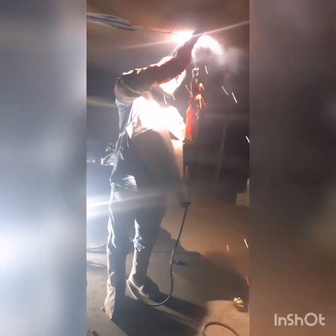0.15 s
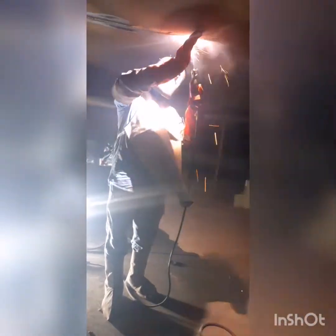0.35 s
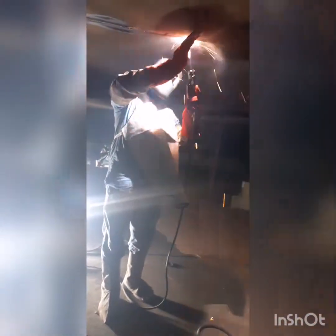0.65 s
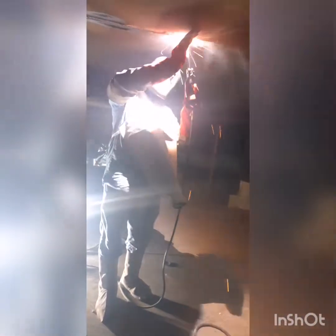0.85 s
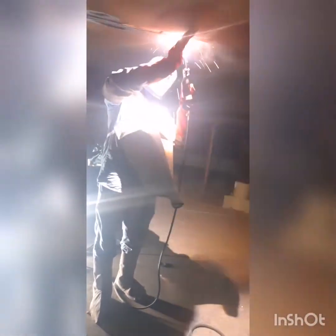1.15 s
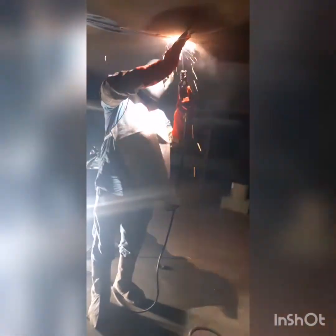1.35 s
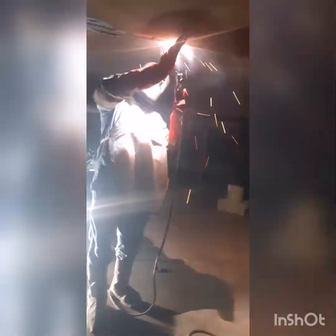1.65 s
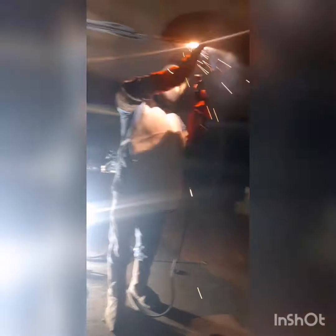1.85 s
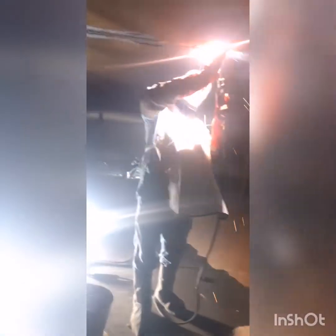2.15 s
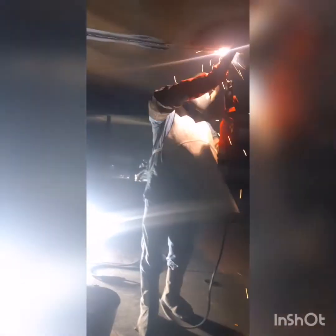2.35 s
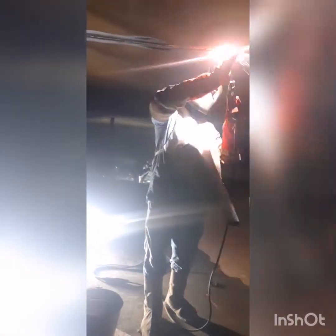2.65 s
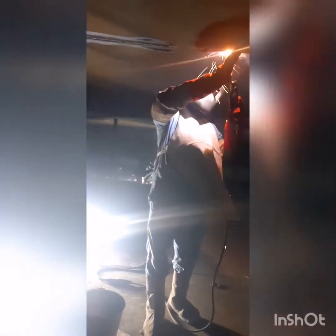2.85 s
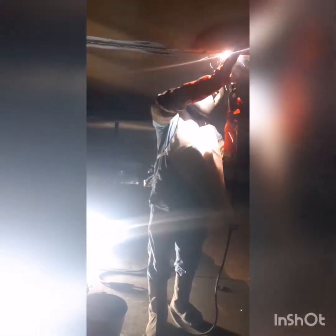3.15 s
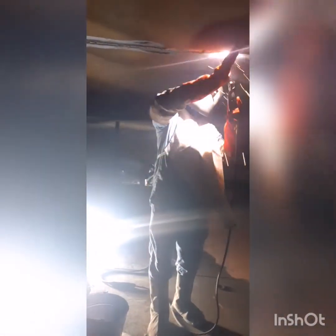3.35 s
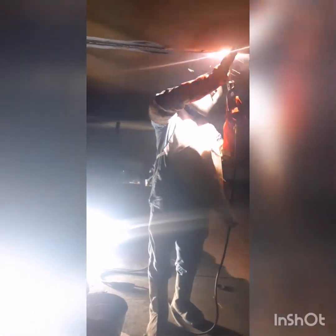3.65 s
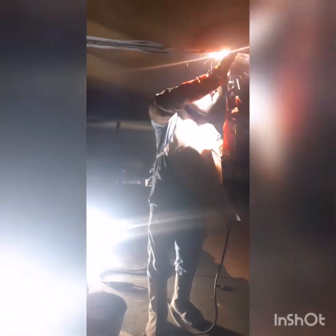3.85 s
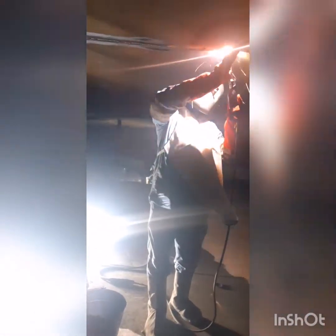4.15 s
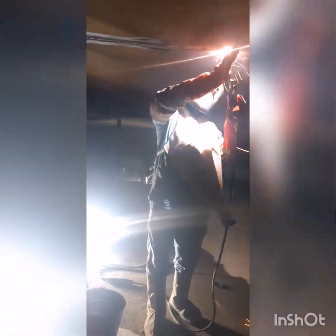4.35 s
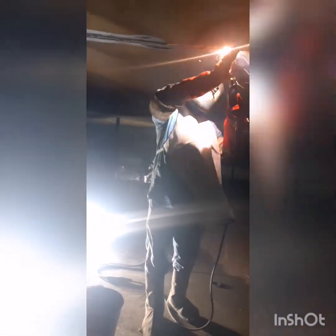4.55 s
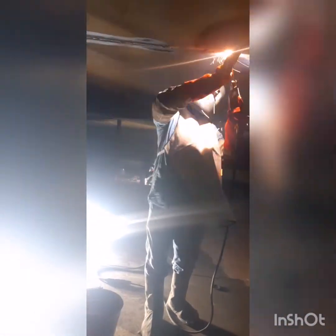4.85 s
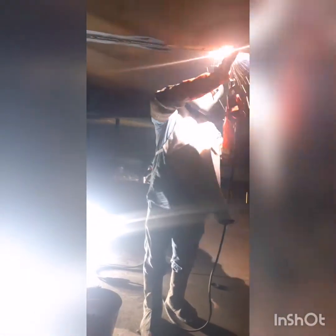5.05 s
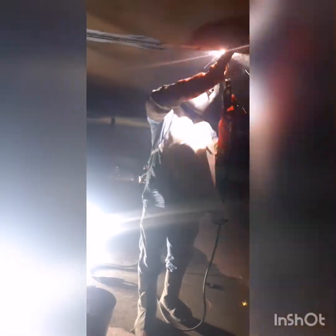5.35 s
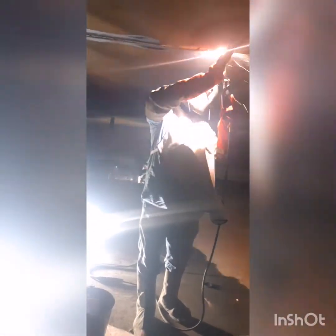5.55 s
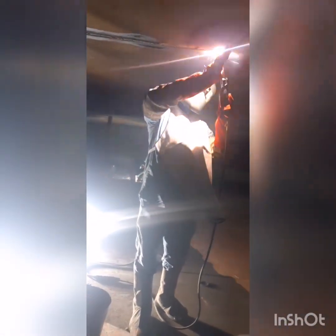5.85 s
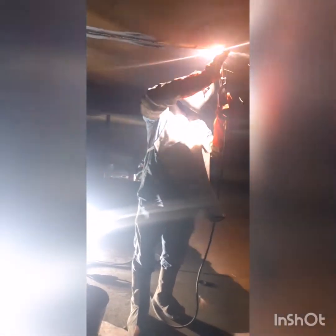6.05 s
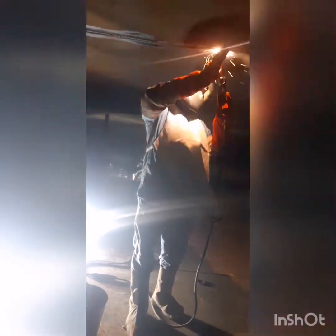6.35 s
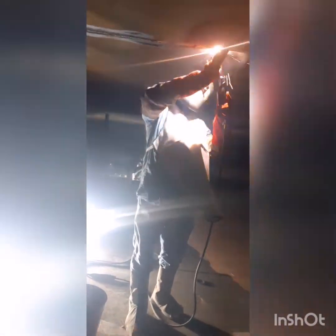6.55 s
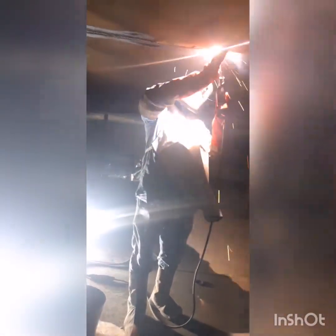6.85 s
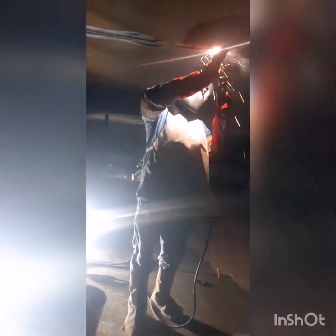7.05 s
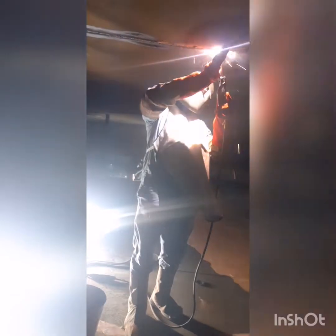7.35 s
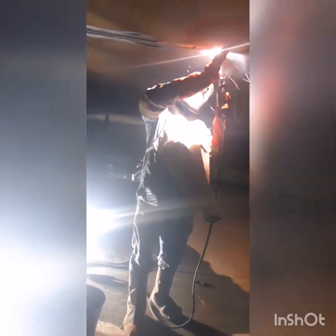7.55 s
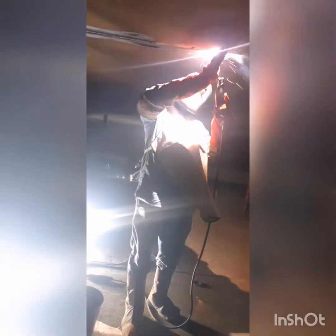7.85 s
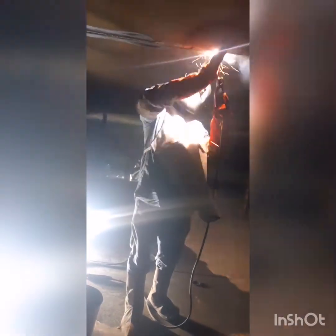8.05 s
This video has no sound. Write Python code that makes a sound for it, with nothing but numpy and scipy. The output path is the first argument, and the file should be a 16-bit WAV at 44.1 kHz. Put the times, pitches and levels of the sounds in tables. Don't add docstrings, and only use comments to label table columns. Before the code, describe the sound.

In a closed, hard-walled metal space, an electric arc roars and sizzles constantly, fluttering as droplets pop and spit. Behind it an extractor fan hums low and pushes breathy air through a duct, sinking when the arc grows loud. The middle is fullest; later the sizzle eases and several sharp, high metallic spatters flare. Handheld stereo pickup, faint handling rumble, short diffuse reverberation.

```python
import sys
import numpy as np
from scipy import signal
from scipy.io import wavfile
from scipy.ndimage import uniform_filter1d, map_coordinates

SR = 44100
rng = np.random.default_rng(int(sys.argv[2]) if len(sys.argv) > 2 else 0)


def boost(x):
    u = np.asarray(x, float) / 20
    return 10 ** u


def unload_wav(signal):
    wavfile.write(
        sys.argv[1],
        SR,
        np.round(np.clip(np.atleast_2d(signal).T, -1, 1) * 32767).astype(np.int16),
    )


N = 362061

# time_s, roar_db, gap (-1 short to 1 long)
ARC_COURSE = [(0.0, -22, -0.2), (1.0, -21.5, -0.43), (1.68, -20, -0.56), (1.88, -19, -0.25),
              (2.17, -20.5, -0.057), (2.63, -21, 0.6), (2.7, -17, 0.7), (3.0, -16, .1), (3.43, -17, -0.026),
              (3.62, -19.5, 0.032), (4.0, -17, 0.54), (4.48, -18.5, -0.032), (5.2, -16.5, 0.26),
              (5.86, -17.5, .1), (6.08, -21.5, 0.39), (6.5, -25, -0.19), (6.86, -27.5, -0.19),
              (8.21, -23.5, -0.048)]
# freq_hz, density_db (per Hz)
ROAR_SPECTRUM = [(290, -38), (500, -22.5), (676, -16.5), (929, -13.5), (1270, -5), (1630, -5), (2540, -4.5),
                 (3700, -3.5), (4400, -3.5), (7170, -4.5), (8770, -13.5), (12800, -11), (15600, -18)]
# centre_hz, level_db, db_per_arc_db, db_per_gap
CAVITY_MODES = [(2590, 1, 0.14, -2), (4430, 2, 0.23, 2), (6620, -0.5, 0, 4)]
CAVITY_WIDTHS_HZ = [800, 650, 800]
# centre_hz, width_hz, level_db
PLATE_MODES = [(1160, 49, 1.5), (1734, 50, 2), (2180, 24, 1), (3044, 36, 4.5), (3510, 41, 2.5),
               (3970, 31, 5.5), (4280, 17, 3), (4400, 18, 1.5), (4500, 23, -9), (5000, 40, 1.5),
               (7660, 30, 5)]
# peak_s, rise_db, fade_s, pitch_hz, spray_db_per_db
DROPLET_SURGES = [(0.2, 2, 0.03, 2800, 1), (0.62, 2, 0.13, 2930, 0), (1.69, 1, 0.012, 2700, .3),
                  (1.78, 3, 0.03, 2600, 0.5), (1.96, 5, .1, 2900, 0), (2.72, 1, 0.12, 7010, 4.5),
                  (2.97, 1.5, 0.11, 2500, -1.5), (3.46, 2.1, .05, 3000, 1.2), (3.54, 4, 0.048, 4400, .5),
                  (3.68, 1.5, 0.052, 3000, 0.5), (3.88, 1, .1, 2900, .4), (4.1, 0.8, 0.13, 4310, 1.2),
                  (4.55, 2, 0.087, 6600, -0.8), (4.73, 3, 0.069, 6600, 0), (4.96, -0.5, 0.012, 4400, 3),
                  (5.03, 1.5, .1, 6700, -1.7), (5.4, 0, .12, 4350, -1), (5.72, 1, 0.12, 4380, -1),
                  (5.9, 0, 0.039, 4500, 2.5), (6.33, 5.5, 0.1, 6650, 0.2), (6.88, 2.5, .06, 4500, 2.5),
                  (7.251, 1.5, 0.13, 4300, 3.5), (7.57, 3, 0.11, 2880, 1.5), (7.88, 3, 0.096, 3600, 1)]
# centre_s, level_db, length_s
POOL_HEAVES = [(1.12, -3, 0.025), (2.72, 4, .02), (2.79, 3.5, 0.037), (2.95, 4, 0.024), (3.36, 2, .12),
               (4.43, 0.5, .05), (4.53, 1, 0.026), (4.85, 3, 0.11), (5.35, 3.5, 0.22), (5.67, 3.5, 0.065),
               (5.9, 2, 0.11), (6.38, 4.5, 0.053), (7.29, 3, 0.034), (7.49, 0, 0.026), (7.57, 1, .04),
               (7.95, 2.5, .06)]
# freq_hz, t60_s
HOLD_T60 = [(500, 0.38), (4000, 0.17), (14000, 0.23)]
# time_s, air_db
FAN_LEVEL = [(0.0, -38), (0.2, -36.5), (0.87, -35), (2.0, -34.5), (2.55, -35.5), (3.0, -43), (3.7, -44.5),
             (4.4, -42), (5.7, -42.5), (6.5, -42), (7.45, -42), (7.93, -36), (8.21, -38)]
# freq_hz, density_db (per Hz)
AIR_SPECTRUM = [(13, -66), (22, -42), (76, -25), (129, -8), (190, -9.5), (243, -4.5), (340, -3.5),
                (428, -8), (689, -0.5), (823, -14), (1130, 4), (1500, -13), (1950, -37), (3300, -120)]
# centre_hz, width_hz, level_db
DUCT_MODES = [(254.7, 47, 10.5), (369, 24, 7.5), (648, 32, 3), (1335, 60, 11.5)]
# time_s, pitch_hz, level_db
BLADE_TONE = [(0.0, 159.5, -56), (0.2, 156.3, -45.5), (0.5, 158, -57), (1.17, 157, -56),
              (1.39, 158.5, -41.5), (1.7, 158.3, -40), (2.08, 160.7, -40.5), (2.17, 159.5, -50),
              (2.42, 160.7, -38), (2.72, 159, -43), (2.9, 159, -56), (3.5, 159.7, -54), (4.45, 160.8, -47),
              (5.8, 162.7, -47), (6.4, 161.5, -48.5), (6.6, 162, -48), (7.55, 161.3, -44.5),
              (8.21, 161.5, -44.5)]
# centre_s, level_db, length_s
BLADE_NULLS = [(1.17, -8, .04), (1.48, -8, .04), (3.64, -5, .05), (4.02, -8, 0.12), (4.34, -12, 0.039),
               (6.45, -9, .04), (6.77, -10, 0.07), (7.61, -7, 0.029)]
# centre_hz, level_db (over air), wander_hz, swing_db
DUCT_WHISTLES = [
    (333.4, -6, 2, 2),
    (698, -5, 7.1, 2),
]
# centre_s, level_db, length_s
DUCT_PUFFS = [
    [(0.12, 11, 0.16), (0.45, 5, .1), (0.85, 6, 0.17), (1.7, 3.5, 0.24), (2.6, 5.5, 0.2), (3.1, 6, 0.18),
     (3.86, 6, .1), (7.36, 8.5, .1), (8.0, 4, .12)],
    [(0.09, 9, 0.074), (0.59, 4, 0.068), (0.85, 8, .08), (1.25, 7.5, 0.3), (1.85, 3, .12), (5.65, 5, .2),
     (6.35, 5, 0.09), (7.36, 10.5, .1), (8.05, 5, 0.17)],
]
# freq_hz, density_db (per Hz)
HAND_SPECTRUM = [(15, -30), (30, -20), (55, -4), (110, 8), (150, -25), (300, -120)]
# start_s, peak_db, ring_hz, t60_s
SPATTER_FLARES = [(6.8743, -19, 5380, 0.12), (7.2275, -9, 6040, 0.091), (7.258, -9, 5940, 0.088),
                  (7.2887, -11.5, 6100, 0.12), (7.4894, -24, 6360, 0.097), (7.5416, -7.5, 6050, 0.12),
                  (7.561, -9, 5980, 0.11), (7.5993, -12, 6200, 0.088), (7.856, -12, 7000, 0.12),
                  (7.892, -8, 6050, 0.14), (7.9044, -12, 6560, 0.12)]

PORT_LAG_S = 18 / SR
MID_ARC_DB, MID_GAIN_DB = -20, -39
SURGE_RISE_PER_FADE = 0.53
BODY_DB, BODY_GROWS, BODY_DUCKS, BODY_PER_GAP_DB = -9, 0.32, 0.5, -2.5
SIZZLE_DB, SIZZLE_GROWS, SIZZLE_DUCKS, SIZZLE_PER_GAP_DB = -9.5, 0.85, 0.22, 1.5
DRIFT_SHARE, DRIFT_DB, DRIFT_KNOTS_PER_S = 0.025, 0.62, 6.2
FAVOUR_DB_PER_DB, FAVOUR_WIDTH_HZ = 1.03, 620


def unit(x):
    return x / np.sqrt(np.mean(x ** 2) + 1e-20)


def steady(x):
    power = uniform_filter1d(np.mean(x ** 2, 0), SR // 4)
    return x / np.sqrt(np.abs(power) + 1e-12)


def along(points, hz):
    point_hz, value = np.transpose(points)
    return np.interp(np.log(hz + 1), np.log(point_hz + 1), value)


def curves(rows, t):
    time_s, *columns = np.transpose(rows)
    return [np.interp(t, time_s, column) for column in columns]


def wobble(knots_per_s):
    knots = rng.standard_normal(int(N * knots_per_s / SR) + 4)
    return map_coordinates(knots, [np.arange(N) * knots_per_s / SR])


def slow(t, knots_per_s):
    return np.interp(t, np.arange(N) / SR, wobble(knots_per_s))


def bump(hz, centre_hz, width_hz):
    return 1 / (1 + (2 * (hz - centre_hz) / width_hz) ** 2)


def bells(rows, t):
    return sum(db * np.exp(-((t - s) / length_s) ** 2) for s, db, length_s in rows)


def patches(shape, bins, frames):
    field = uniform_filter1d(rng.standard_normal(shape), bins, 0)
    return unit(uniform_filter1d(field, frames, 1))


def diffuse(gain_db, patchy_db, streaky_db, endwise, size):
    hz, t, (one, other) = signal.stft(rng.standard_normal((2, N)), SR, nperseg=size)
    hz = hz[:, None]
    broad = patches(one.shape, size // 96, 8192 // size)
    thin = patches(one.shape, 2, 5)
    end = np.sign(patches(one.shape, size // 16, 16384 // size))
    share = np.clip(endwise, 0, 1)
    all_round = np.sinc(1.89 * hz * PORT_LAG_S)
    in_line = np.exp(2j * np.pi * hz * PORT_LAG_S * end)
    alike = (1 - share) * all_round + share * in_line
    pair = np.array([one, alike * one + np.sqrt(np.abs(1 - np.abs(alike) ** 2)) * other])
    shape_db = gain_db(hz, t) + patchy_db * broad + streaky_db * thin
    return signal.istft(pair * boost(shape_db), SR, nperseg=size)[1][:, :N]


def hold(x):
    hz, t, z = signal.stft(rng.standard_normal((2, SR // 2)), SR, nperseg=256)
    decay = boost(-60 * t / along(HOLD_T60, hz)[:, None])
    tail = signal.istft(z * decay, SR, nperseg=256)[1]
    return signal.fftconvolve(x, tail / np.linalg.norm(tail[0]), axes=1)[:, :N]


def each_surge(t):
    peak_s, rise_db, fade_s = np.transpose(DROPLET_SURGES)[:3, :, None]
    u = (t - peak_s) / fade_s
    return rise_db * np.exp(np.where(u < 0, u / SURGE_RISE_PER_FADE, -u))


def surge(t):
    return each_surge(t).sum(0)


def roar_colour(hz, t):
    level_db, gap = curves(ARC_COURSE, t)
    surges_db = each_surge(t)
    surge_hz, spray = np.transpose(DROPLET_SURGES)[3:]
    over_db = level_db + surge(t) - MID_ARC_DB
    gain_db = curves(FAN_LEVEL, t)[0] - MID_GAIN_DB

    body_db = BODY_DB + (BODY_GROWS - 1) * over_db + BODY_DUCKS * gain_db + BODY_PER_GAP_DB * gap
    body_db = body_db + bells(POOL_HEAVES, t) + 0.45 * slow(t, 12)
    sizzle_db = SIZZLE_DB + (SIZZLE_GROWS - 1) * over_db + SIZZLE_DUCKS * gain_db + SIZZLE_PER_GAP_DB * gap
    sizzle_db = sizzle_db + spray @ surges_db + 0.37 * slow(t, 8.9)
    low = 1 / (1 + (hz / 1900) ** 6)
    high = 1 / (1 + (8300 / (hz + 1)) ** 12)

    cavity = 0
    for (centre_hz, db, grows, per_gap), width_hz in zip(CAVITY_MODES, CAVITY_WIDTHS_HZ):
        peak_db = db + grows * over_db + per_gap * gap + DRIFT_DB * slow(t, DRIFT_KNOTS_PER_S)
        drifting_hz = centre_hz * (1 + DRIFT_SHARE * slow(t, DRIFT_KNOTS_PER_S))
        cavity = cavity + peak_db * bump(hz, drifting_hz, width_hz)
    plate = sum(db * bump(hz, centre_hz, width_hz) for centre_hz, width_hz, db in PLATE_MODES)
    favour = FAVOUR_DB_PER_DB * bump(hz, surge_hz, FAVOUR_WIDTH_HZ) @ surges_db
    tilt = low * (body_db + 12) + high * (sizzle_db + 10)
    return along(ROAR_SPECTRUM, hz) + cavity + favour + plate + tilt


def sparks(count):
    when, pitch, side, chance = rng.random((count, 4)).T
    t = np.arange(64) / SR
    hz = 1500 * boost(16 * pitch)[:, None]
    size = boost(-5 * np.log(chance + 0.013))[:, None]
    pops = size * np.sin(2 * np.pi * hz * t) * np.exp(-hz * t / 0.34)
    at = (when * N).astype(int)[:, None] + np.arange(64) + 20
    lag = np.round((side - 0.5) * 2 * PORT_LAG_S * SR).astype(int)[:, None]
    pair = [np.bincount((at + k * lag // 2).ravel(), pops.ravel(), N + 128)[:N] for k in (1, -1)]
    return unit(np.array(pair))


def arc():
    t = np.arange(N) / SR
    roar_db = curves(ARC_COURSE, t)[0] + surge(t)
    flutter = boost(0.22 * wobble(14) + 0.38 * wobble(40) + 0.85 * wobble(350))
    roar = flutter * steady(diffuse(roar_colour, patchy_db=0.2, streaky_db=2.5, endwise=0.18, size=1024))
    crackle = sparks(count=2500)
    crackle = crackle + boost(-2) * hold(crackle)
    no_bass = signal.butter(4, 1100, "high", fs=SR, output="sos")
    crackle = signal.sosfilt(no_bass, crackle)
    return boost(roar_db + 4.5) * (roar + boost(-19.5) * crackle)


def duct_colour(hz, t):
    modes = sum(db * bump(hz, centre_hz, width_hz) for centre_hz, width_hz, db in DUCT_MODES)
    return along(AIR_SPECTRUM, hz) + modes


def fan():
    t = np.arange(N) / SR
    air = unit(diffuse(duct_colour, patchy_db=1.16, streaky_db=1.6, endwise=0.012, size=4096))
    air_db = curves(FAN_LEVEL, t)[0] + 6.0 + 1.24 * wobble(12)
    blade_hz, tone_db = curves(BLADE_TONE, t)
    turns = np.cumsum(blade_hz + 1.6 * wobble(16)) / SR
    tone_db = tone_db + bells(BLADE_NULLS, t) + 1.8 * wobble(9)
    tone = np.sqrt(2) * np.sin(2 * np.pi * turns) * boost(tone_db)
    return boost(air_db) * air + tone


def whistles():
    t, out = np.arange(N) / SR, 0
    ducked_db = MID_GAIN_DB + 1.04 * (curves(FAN_LEVEL, t)[0] - MID_GAIN_DB)
    for (centre_hz, db, wander_hz, swing_db), puffs in zip(DUCT_WHISTLES, DUCT_PUFFS):
        def line(hz, s):
            return 20 * np.log10(bump(hz, centre_hz + wander_hz * slow(s, 4), 19.4))
        band = steady(diffuse(line, patchy_db=0, streaky_db=0, endwise=0, size=8192))
        out = out + band * boost(db + ducked_db + swing_db * wobble(3.5) + bells(puffs, t))
    return out


def handling():
    def colour(hz, t):
        return along(HAND_SPECTRUM, hz)
    both, each = (diffuse(colour, patchy_db=0, streaky_db=0, endwise=0, size=4096)[0] for _ in range(2))
    rumble = unit(np.array([both + 0.46 * each, both - 0.48 * each]))
    return boost(-72 + 4.1 * wobble(7.9)) * rumble


def flares():
    out, t = np.zeros((2, N + SR)), np.arange(SR // 4) / SR
    family = [(0.99, 1.0), (1.14, 0.5), (0.957, 0.21), (0.68, 0.29)]
    for start_s, peak_db, ring_hz, t60_s in SPATTER_FLARES:
        envelope = boost(-60 * t / t60_s) * (1 - np.exp(-t / 0.0013))
        spray = rng.standard_normal((2, len(t))) * envelope
        ring = 0
        for ratio, gain in family:
            b, a = signal.iirpeak(ratio * ring_hz, ring_hz / 380, SR)
            ring = ring + gain * signal.lfilter(b, a, spray)
        hiss = np.diff(spray, prepend=0)
        start = round(start_s * SR)
        out[:, start:start + len(t)] += boost(peak_db - 1.5) * (3 * ring + 0.2 * hiss)
    out = out[:, :N]
    return out + boost(-4) * hold(out)


def masked_gaps(x, depth_db, rarity):
    hz, t, z = signal.stft(x, SR, nperseg=1024)
    hz = hz[:, None]
    loudness = np.clip((curves(ARC_COURSE, t)[0] + 25) / 7, 0, 1)
    under = bump(hz, 1300, 2200) * loudness
    chance = patches(z.shape[1:], 3, 3)
    gap = np.clip(4 * (chance - rarity + under), 0, 1) * (under > 0.25) * (hz > 350)
    lost = z.mean(0) * (1 - boost(depth_db * gap))
    return signal.istft(z - lost, SR, nperseg=1024)[1][:, :N]


def scene():
    return arc() + fan() + whistles() + handling() + flares()


def band_limit(x):
    return signal.sosfilt(signal.butter(12, 15750, fs=SR, output="sos"), x)


def record(dry):
    thinned = masked_gaps(dry, depth_db=-24, rarity=2.2)
    bent = thinned / (1 + np.abs(thinned / 0.97) ** 5) ** (1 / 5)
    return band_limit(bent)


dry = scene()
out = record(dry)
unload_wav(out)
```